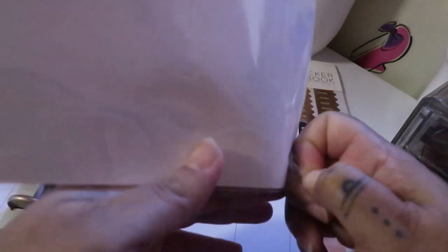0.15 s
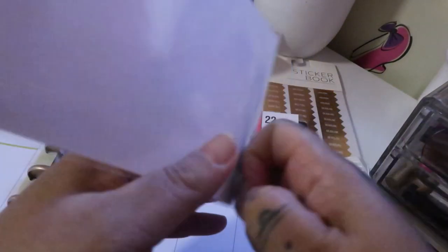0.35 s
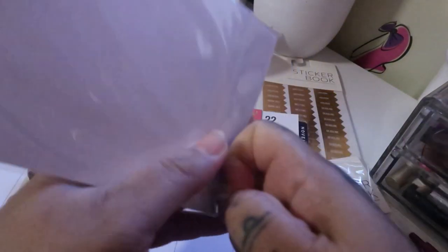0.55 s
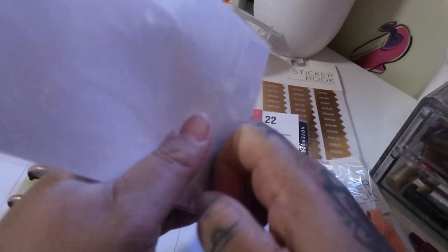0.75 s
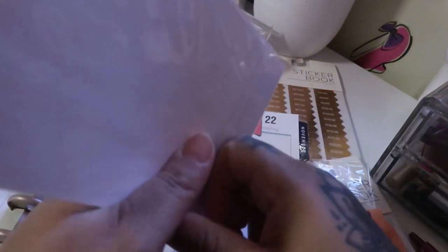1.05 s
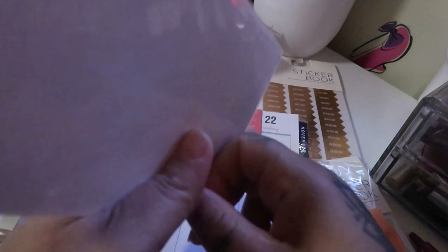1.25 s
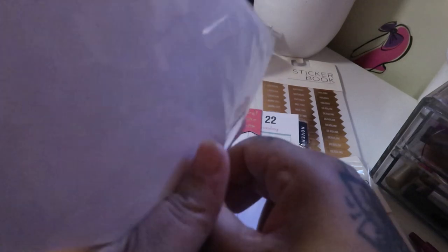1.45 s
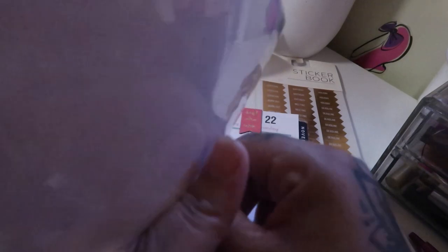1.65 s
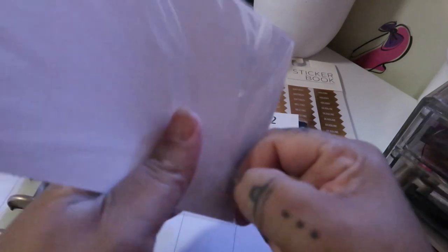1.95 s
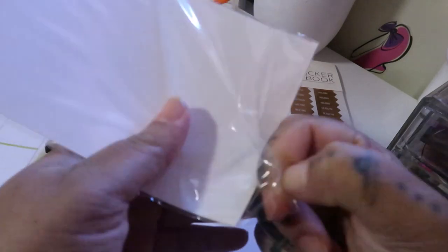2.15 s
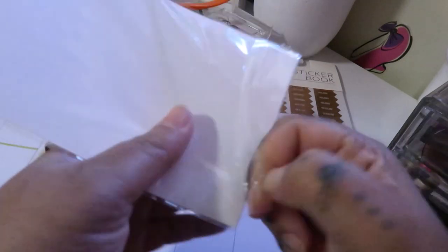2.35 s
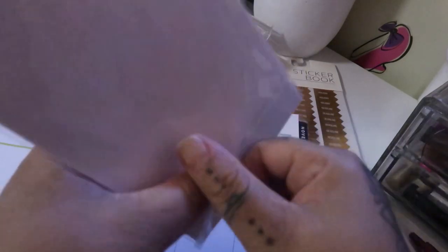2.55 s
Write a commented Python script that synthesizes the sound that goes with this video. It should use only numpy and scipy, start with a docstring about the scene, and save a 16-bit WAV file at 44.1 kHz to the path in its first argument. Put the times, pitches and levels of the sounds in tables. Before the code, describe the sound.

Fingers pick at a film-covered paper sheet, making scattered crisp crackles, a small flexing knock, a quieter lull, then a dense burst of loud snaps; close stereo microphone at a desk in a quiet, softly humming room.

```python
"""Desk, stereo microphone close by: fingers work at the corner of a film-wrapped paper sheet.
Film creases snap one by one: strain, decaying ring, noise crack, dull pop, lumpy noise shiver.
Between them: crinkles (random clicks into short resonances) and rubbing (banded noise).
The card flexes and the desk is bumped with short low sines; feedback delays echo the sheet.
Below lie a low room hum and a faint hiss, both banded noise."""
import sys
import numpy as np
from scipy import signal
from scipy.fft import rfft, irfft, next_fast_len
from scipy.io import wavfile

SR = 44100
rng = np.random.default_rng(int(sys.argv[2]) if len(sys.argv) > 2 else 0)


def to_linear_factor(level_db):
    """Convert decibel levels (scalar or array-like) to linear amplitude factors."""
    exponent = np.asarray(level_db, float) / 20
    return 10 ** exponent


def bounce(signal):
    """Save signal as a 16-bit WAV file at the path given by the first command-line argument."""
    frames = np.transpose(np.atleast_2d(signal))
    limited = np.clip(frames, -1, 1)
    pcm = np.round(limited * 32767).astype(np.int16)
    wavfile.write(sys.argv[1], SR, pcm)


N = 119070

# Spectrum of the room tone, relative: freq_hz, density_db
ROOM_SPECTRUM = [(25, -5), (50, -5.5), (150, 3.5), (233, -7), (420, -12.5), (624, -21.5), (1050, -15),
                 (1300, -22.5), (2900, -29), (4000, -27), (16000, -48)]
# Left-right likeness of the room tone: freq_hz, correlation
ROOM_LIKENESS = [(130, 1), (290, 0.87), (640, 0.039), (3100, 0.028), (7000, 0.018)]
# Left-right likeness of the sheet: freq_hz, correlation
SHEET_LIKENESS = [(300, 0.99), (2400, 1), (4400, 0.88), (8000, 0.35), (15000, 0.022)]
# How busily the fingers handle the sheet, before layer gains: time_s, rustle_db, bright_db
HANDLING_CURVE = [(0, -56, -57), (.12, -48.5, -46), (0.268, -49, -46.5), (0.307, -59, -62),
                  (0.376, -43.5, -43), (0.41, -51, -50), (.5, -46, -43.5), (.69, -47, -47),
                  (0.859, -41.5, -52.5), (.93, -55.5, -66), (1.45, -54, -57.5), (1.75, -62.5, -58.5),
                  (1.82, -58, -46.5), (1.91, -54.5, -58), (1.94, -49.5, -40), (2.12, -47.5, -41.5),
                  (2.25, -42.5, -33), (2.34, -47.5, -50), (2.412, -41.5, -33), (2.522, -51, -56),
                  (2.7, -48.5, -55.5)]
# Spectrum of the rubbing, relative: freq_hz, density_db
RUB_SPECTRUM = [(300, 22), (700, -8.5), (1500, 14), (2800, 11), (4500, 3), (7500, -25)]
# Spectrum of the bright rubbing, relative: freq_hz, density_db
BRIGHT_SPECTRUM = [(6000, -6), (8000, 4), (11000, 0.8), (15000, 1)]
# A finger bumps the desk: start_s, level_db, pitch_hz
DESK_BUMPS = [(.845, -27, 122.6), (1.465, -31.5, 112)]
# The card flexes, before FLEX_GAIN_DB: start_s, level_db, pitch_hz
CARD_FLEXES = [(.3605, -27.5, 320), (.4285, -26, 1160), (.481, -27, 880), (.640, -25.5, 625),
               (.648, -30, 544), (.710, -26, 1060), (.741, -27, 1020), (.8275, -22, 382), (.8465, -14, 343),
               (.8478, -11, 1090), (.850, -22, 383), (.897, -29, 870), (2.023, -15.5, 1370),
               (2.192, -28, 734), (2.2005, -22.5, 423), (2.260, -17.5, 800)]
# Creases that snap, before part gains: start_s, ring_hz, ring_db, crack_db, pop_db
CREASE_SNAPS = [(0.0362, 5150, -34.5, -44.5, -37.5), (0.102, 3420, -20.5, -18.5, -63),
                (0.1544, 1930, -38, -46, -58), (0.1886, 3480, -32.5, -31.5, -44),
                (0.259, 2860, -27.5, -35.5, -26.5), (0.4208, 4530, -21, -25, -57),
                (0.482, 4280, -15, -34, -72), (0.53, 2300, -33, -28, -51), (0.544, 2400, -35, -25, -46),
                (0.5548, 2480, -27.5, -33.5, -25.5), (0.6128, 6070, -48, -32, -51),
                (0.62, 6500, -24.5, -43, -39), (0.6428, 4300, -33, -29, -31.5),
                (0.732, 3120, -24.5, -29, -32), (0.7387, 2600, -25.5, -21.5, -35),
                (0.8271, 3600, -24.5, -25, -23), (0.835, 3530, -21.5, -20.5, -36),
                (0.8533, 2280, -23.5, -32, -31), (0.8627, 2270, -28.5, -29, -40),
                (1.1013, 2560, -37.5, -46, -70), (1.4002, 4670, -39.5, -50, -61),
                (1.4741, 4260, -24, -31.5, -44.5), (1.5681, 4260, -54, -40.5, -60),
                (1.638, 3400, -30.5, -33, -43.5), (1.795, 4100, -29, -26, -43.5),
                (1.8987, 3780, -34, -43, -39.5), (1.9304, 6350, -23.5, -19.5, -48),
                (1.951, 2820, -23.5, -27, -33), (1.977, 2400, -28, -45, -57),
                (1.993, 3380, -25.5, -30, -59), (2.0188, 4140, -14, -15, -36),
                (2.0269, 3340, -27, -32, -27), (2.153, 3900, -13.5, -28, -23), (2.17, 5940, -18, -40, -33),
                (2.18, 3340, -8, -12, -33), (2.2067, 6500, -21, -35, -37), (2.2169, 5140, -15.5, -16, -31),
                (2.2275, 2800, -1, -13, -15.5), (2.237, 4470, -15.5, -22, -21),
                (2.25, 5600, -9.5, -21, -23), (2.2835, 5430, -7, -13.5, -24), (2.2915, 3520, -13, -26, -25),
                (2.3605, 3900, -19, -39, -49), (2.3718, 2820, -18, -16, -21), (2.3800, 2700, -19, -35, -34),
                (2.3883, 4530, -20, -19.5, -50), (2.3969, 2900, -13, -15, -56),
                (2.3998, 2930, -29, -29, -42), (2.4166, 2980, -15.5, -32, -34),
                (2.4247, 5100, -20.5, -30, -20.5), (2.434, 6350, -19.5, -27, -44),
                (2.4394, 5800, -22, -35, -39), (2.4569, 3980, -46, -32, -53),
                (2.4716, 2920, -24.5, -28, -25), (2.499, 2200, -48, -38, -25.5),
                (2.5136, 6800, -30, -42.5, -45), (2.5371, 6400, -30, -41, -37.5),
                (2.5908, 1800, -61, -38.5, -42), (2.66, 2460, -39.5, -38, -35.5)]

ROOM_DB, ROOM_PATCHY_DB = -45, 0.84
ECHO_T60_S, ECHO_GAIN_DB, WALL_CUT_HZ, ECHO_CROSS_GAIN = 0.14, -18, 8100, 0.71
RUB_GAIN_DB, BRIGHT_GAIN_DB, RUB_PATCHY_DB = -3.5, -5.5, 3
CRINKLES_PER_S, CRINKLE_SPREAD_DB, CRINKLE_CYCLES = 1200, 3.5, 3.05
COARSE_GAIN_DB, FINE_GAIN_DB = -2.5, -0.94
CREASING_DB = -46  # gentler handling than this rubs more than it creases
BUMP_CYCLES, FLEX_CYCLES, FLEX_GAIN_DB = 13.6, 5.0, 2.5
RISE_S = 0.000092  # time constant of a crease giving
RING_CYCLES, RING_GAIN_DB, RING_SPREAD_LN = 13.4, 5.5, 0.43
CRACK_HZ, CRACK_DECAY_S, CRACK_TONE, CRACK_GAIN_DB = 5750, 0.0005, 0.38, 3
POP_HZ, POP_CYCLES, POP_LAG_S, POP_GAIN_DB = 953, 7.0, 0.00081, 3
SHIVER_GAIN_DB, SHIVER_T60_S, SHIVER_LUMPS_DB, SIZZLE_GAIN_DB = -9, 0.046, 4.5, -8
FILM_LOW_HZ, FILM_TOP_HZ = 1650, 5270
STRAIN_GAIN_DB, STRAIN_S = -11, 0.002
MIC_TOP_HZ = 14500


def rms_one(x):
    """Scale to rms 1."""
    return x / np.sqrt(np.mean(x ** 2) + 1e-20)


def at_hz(points, hz):
    """Read a (freq_hz, value) table on a log axis."""
    p = np.array(points)
    return np.interp(np.log(hz + 1), np.log(p[:, 0] + 1), p[:, 1])


def drift(rate_hz):
    """Slow random drift, rms 1: two-pole filtered noise at one value per 40 samples."""
    r = np.exp(-80 * np.pi * rate_hz / SR)
    noise = rng.standard_normal(N // 40 + 2002)
    slow = signal.lfilter([1], [1, -2 * r, r * r], noise)[2000:]
    return np.interp(np.arange(N) / 40, np.arange(len(slow)), rms_one(slow))


def cut(x, hz, kind):
    """Second-order high- or low-pass."""
    sos = signal.butter(2, np.clip(hz, 20, .45 * SR), kind, fs=SR, output="sos")
    return signal.sosfilt(sos, x)


def add(out, start_s, sound):
    """Mix a sound in at start_s."""
    i = int(start_s * SR)
    out[..., i:i + sound.shape[-1]] += sound[..., :N - i]


def ping(hz, cycles, phase=0):
    """Sine with a quick rise that decays by 60 dB in the given cycles."""
    t = np.arange(4000) / SR
    decay = to_linear_factor(-60 * t * hz / cycles)
    return np.sin(2 * np.pi * hz * t + phase) * decay * (1 - np.exp(-t / RISE_S))


def coloured(spectrum, alike, patchy_db, together):
    """Half-octave bands of stereo noise, each with its level, flicker and likeness; rms 1."""
    out, edges = 0, 25 * 2 ** np.arange(0, 9.6, .5)
    white = rng.standard_normal((2, 2, N))
    for k, (low, high) in enumerate(zip(edges, edges[1:])):
        hz = np.sqrt(low * high)
        if spectrum[0][0] * .7 < hz < spectrum[-1][0] * 1.2:
            band = signal.butter(2, [low, high], "band", fs=SR, output="sos")
            mid, side = signal.sosfilt(band, white[k % 2])  # neighbours use separate noise
            c = np.clip(at_hz(alike, hz), -1, 1)
            flicker_db = patchy_db * (together + .5 * drift(40))
            gain = to_linear_factor(at_hz(spectrum, hz) + flicker_db)
            out = out + gain * (np.sqrt(1 + c) * mid + np.sqrt(1 - c) * side * [[1], [-1]])
    return rms_one(out)


def room_tone():
    """Low hum and faint hiss: noise falling towards the treble, gently unsteady."""
    tone = coloured(ROOM_SPECTRUM, ROOM_LIKENESS, ROOM_PATCHY_DB, drift(11))
    return to_linear_factor(ROOM_DB) * tone


def walls(x):
    """Echo: eight feedback delays a side, duller on every round, crossed between sides."""
    size = next_fast_len(N + SR)
    w, echo = 2 * np.pi * np.arange(size // 2 + 1) / size, np.zeros((2, N))
    dull = 1 / (1 + 1j * w * SR / (2 * np.pi * WALL_CUT_HZ))
    spectrum = rfft(x, size)
    all_lags = (rng.uniform(0.0053, .03, (2, 8)) * SR).astype(int)
    for side, lags in enumerate(all_lags):
        loops = [to_linear_factor(-60 * lag / SR / ECHO_T60_S) * dull * np.exp(-1j * w * lag) for lag in lags]
        response = sum((-1) ** k * g / (1 - g) for k, g in enumerate(loops))
        echo[side] = irfft(spectrum * response, size)[:N]
    echo = cut(echo, 370, "high")
    return to_linear_factor(ECHO_GAIN_DB) * (echo + ECHO_CROSS_GAIN * echo[::-1])


def rubbing(rustle, bright, busy):
    """Friction of fingers on film: patchy noise in a lower and a bright layer."""
    low = coloured(RUB_SPECTRUM, SHEET_LIKENESS, RUB_PATCHY_DB, busy)
    high = coloured(BRIGHT_SPECTRUM, SHEET_LIKENESS, RUB_PATCHY_DB, busy)
    return to_linear_factor(RUB_GAIN_DB) * rustle * low + to_linear_factor(BRIGHT_GAIN_DB) * bright * high


def resonate(low_hz, high_hz, clicks):
    """Deal clicks at random to twelve short resonances across the film; rms 1."""
    dealt, out = rng.integers(0, 12, N), 0
    for k, hz in enumerate(np.geomspace(low_hz, high_hz, 12)):
        r, w = to_linear_factor(-60 * hz / (CRINKLE_CYCLES * SR)), 2 * np.pi * hz / SR
        mine = clicks * (dealt == k) + 1e-18
        out = out + signal.lfilter([0, np.sin(w)], [1, -2 * r * np.cos(w), r * r], mine)
    return rms_one(out)


def crinkles(rustle, bright, busy):
    """Tiny random creases: clicks of random size and sign, denser when busy, ring the film."""
    sizes_db = CRINKLE_SPREAD_DB * np.minimum(rng.exponential(1, N), 4)
    sizes = to_linear_factor(sizes_db) * rng.choice([-1, 1], N)
    clicks = sizes * (rng.random(N) < CRINKLES_PER_S * to_linear_factor(3.5 * busy) / SR)
    coarse = to_linear_factor(COARSE_GAIN_DB) * rustle * resonate(712, 4700, clicks)
    fine = to_linear_factor(FINE_GAIN_DB) * bright * resonate(4840, 9100, clicks)
    return (coarse + fine) * np.minimum(rustle / to_linear_factor(CREASING_DB), 1)


def knocks(rows, cycles, gain_db):
    """Card flexes or desk bumps: a short damped mode and a weaker one 2.35 times higher."""
    out = np.zeros(N)
    for start_s, level_db, hz in rows:
        modes = ping(hz, cycles) + .5 * ping(hz * 2.35, cycles)
        knock = cut(cut(modes, hz * 8, "low"), hz * 0.49, "high")
        add(out, start_s, -to_linear_factor(level_db + gain_db) * knock)
    return out


def snaps():
    """Creases giving way: strain, ring, crack, pop, shiver; row 0 shared, row 1 port difference."""
    out, t = np.zeros((2, N)), np.arange(4000) / SR
    for start_s, hz, ring_db, crack_db, pop_db in CREASE_SNAPS:
        noise, chance = rng.standard_normal((4, 2, 4000)), rng.uniform(-0.96, 1, 6)

        ring = ping(hz, RING_CYCLES)
        for detune, phase in chance.reshape(3, 2):  # side modes
            side_hz = hz * np.exp(RING_SPREAD_LN * detune)
            ring = ring + .5 * ping(side_hz, RING_CYCLES * 0.4, phase * np.pi)

        # thin creases, those that crack more than they ring, crack higher
        thin = np.tanh((crack_db - ring_db) / 11.4)
        centre_hz = CRACK_HZ * 1.08 * np.exp(0.68 * chance[3] + 0.24 * thin)
        bright = cut(noise[0], CRACK_HZ, "high")
        tone = cut(cut(bright, centre_hz * 0.66, "high"), centre_hz * 0.77, "low")
        crack = (bright + CRACK_TONE * 4 * tone) * np.exp(-t / CRACK_DECAY_S)
        crack = crack / np.abs(crack[0]).max() * 2

        lumps = to_linear_factor(SHIVER_LUMPS_DB * np.repeat(noise[3, 0, :100], 40))
        film = cut(cut(noise[1:3], FILM_LOW_HZ, "high"), FILM_TOP_HZ, "low")
        sizzle = to_linear_factor(crack_db + SIZZLE_GAIN_DB) * bright[:, ::-1]
        shiver = to_linear_factor(ring_db + SHIVER_GAIN_DB) * film[0] + sizzle
        shiver = shiver * lumps * to_linear_factor(-60 * t / SHIVER_T60_S)

        # the strain swells up to the snap: a decay played backwards
        strain = (film[1] * lumps * np.exp(-t / STRAIN_S))[:, 999::-1]
        force = np.hypot(to_linear_factor(ring_db), to_linear_factor(crack_db))
        pop = ping(POP_HZ * np.exp(0.22 * chance[0]), POP_CYCLES)

        ring = np.sign(chance[1]) * to_linear_factor(ring_db + RING_GAIN_DB) * ring
        add(out, start_s, ring + to_linear_factor(crack_db + CRACK_GAIN_DB) * crack + shiver)
        add(out, start_s - 1000 / SR, to_linear_factor(STRAIN_GAIN_DB) * force * strain)
        add(out, start_s + POP_LAG_S, to_linear_factor(pop_db + POP_GAIN_DB) * pop)
    return out


def two_ports(x):
    """Stereo pickup: the ports hear the sheet alike in the lows, ever less alike in the treble."""
    size = next_fast_len(N + 4096)
    c = np.clip(at_hz(SHEET_LIKENESS, np.arange(size // 2 + 1) * SR / size), -1, 1)
    weights = np.sqrt([1 + c, 1 - c]) * [[1], [1j]]  # side turned by 90 degrees
    mid, side = irfft(rfft(x, size) * weights, size)[:, :N]
    return np.array([mid + side, mid - side]) / np.sqrt(2)


def scene():
    """Room tone, echo, rubbing and the creasing sheet."""
    time_s, rustle_db, bright_db = np.transpose(HANDLING_CURVE)
    t = np.arange(N) / SR
    rustle = to_linear_factor(np.interp(t, time_s, rustle_db))
    bright = to_linear_factor(np.interp(t, time_s, bright_db))
    busy = drift(25)
    sheet = crinkles(rustle, bright, busy) + knocks(DESK_BUMPS, BUMP_CYCLES, 0)
    sheet = sheet + knocks(CARD_FLEXES, FLEX_CYCLES, FLEX_GAIN_DB) + snaps()
    return room_tone() + walls(sheet[0]) + rubbing(rustle, bright, busy) + two_ports(sheet)


def top_cut(x):
    """Nothing passes above the cut-off."""
    return signal.sosfilt(signal.butter(12, 16630, fs=SR, output="sos"), x)


def record(dry):
    """Microphone: peaks clip near full scale, the top rolls off."""
    clipped = np.clip(dry, -.85, .85)
    mix = signal.sosfilt(signal.butter(12, MIC_TOP_HZ, fs=SR, output="sos"), clipped)
    return top_cut(mix)


dry = scene()
out = record(dry)
bounce(out)
```